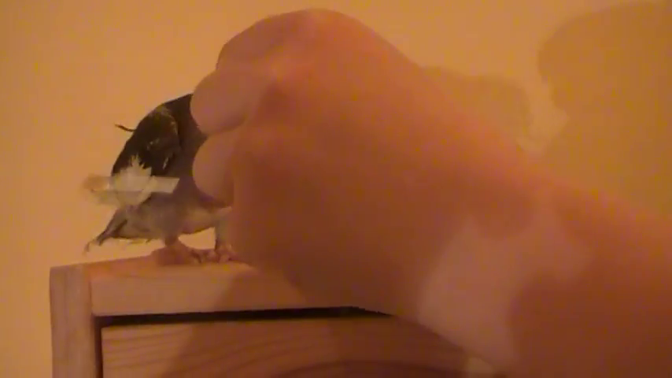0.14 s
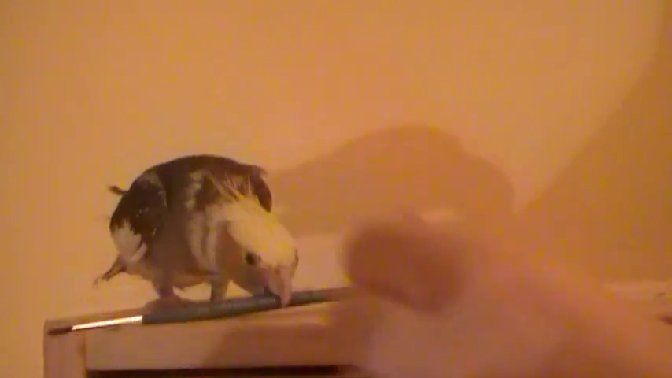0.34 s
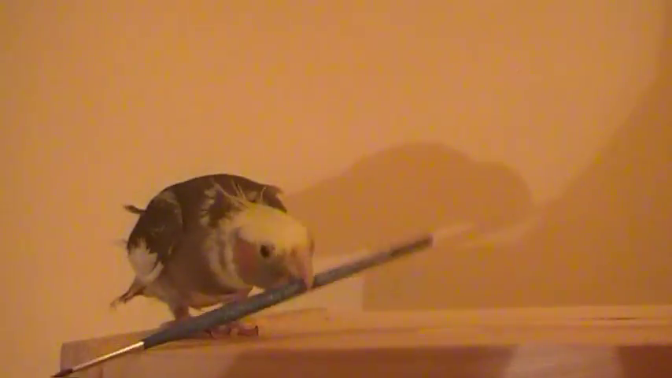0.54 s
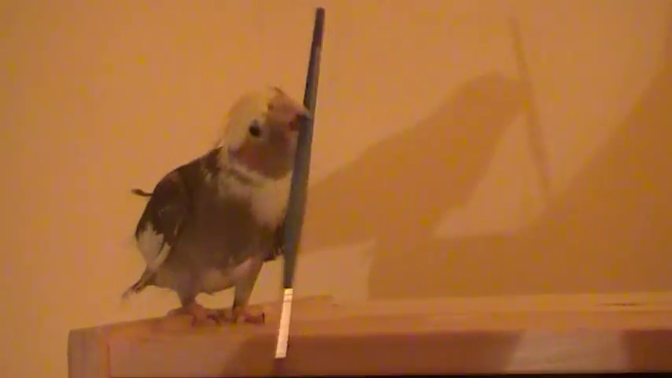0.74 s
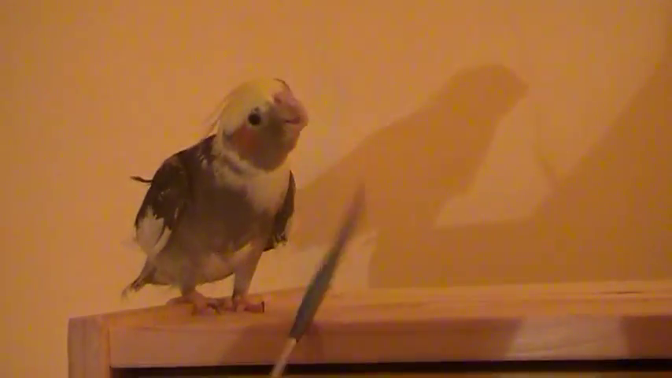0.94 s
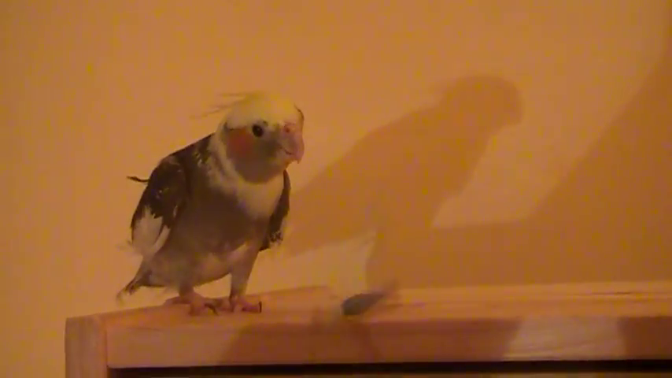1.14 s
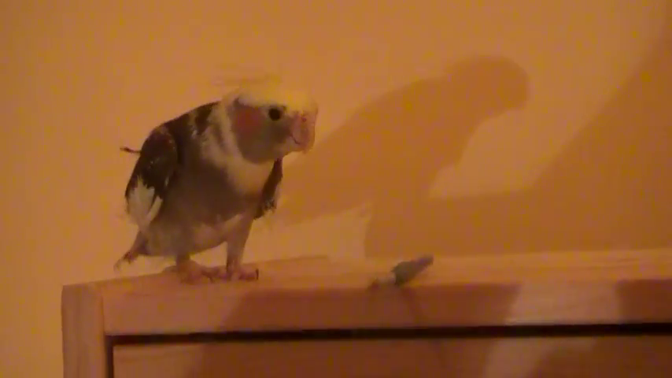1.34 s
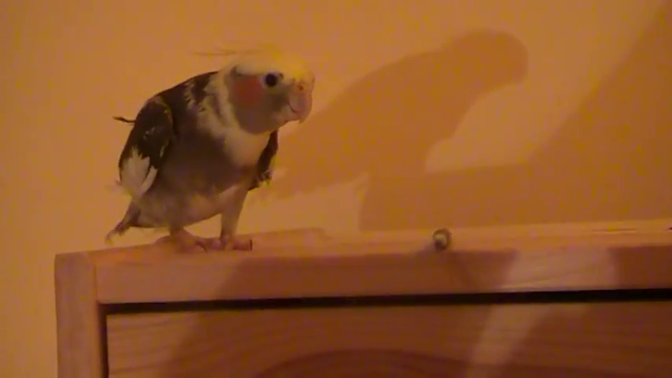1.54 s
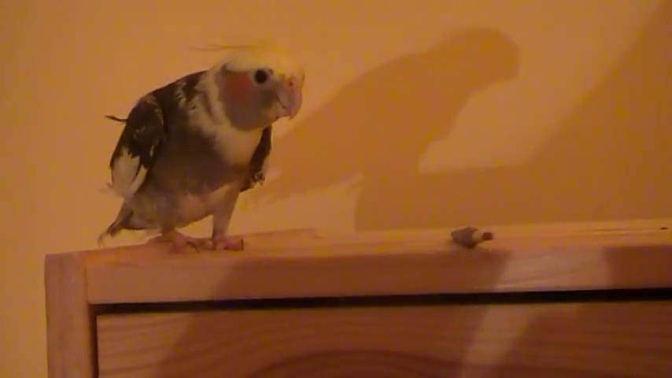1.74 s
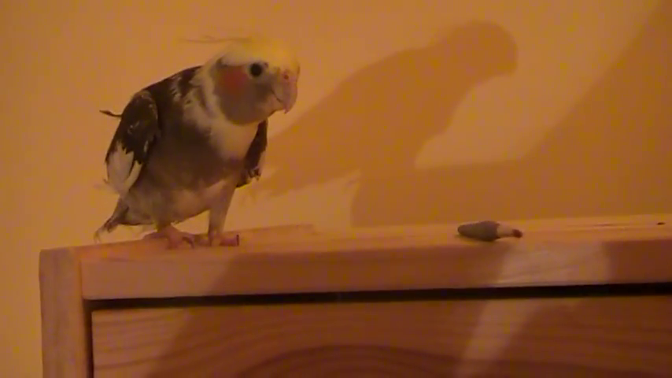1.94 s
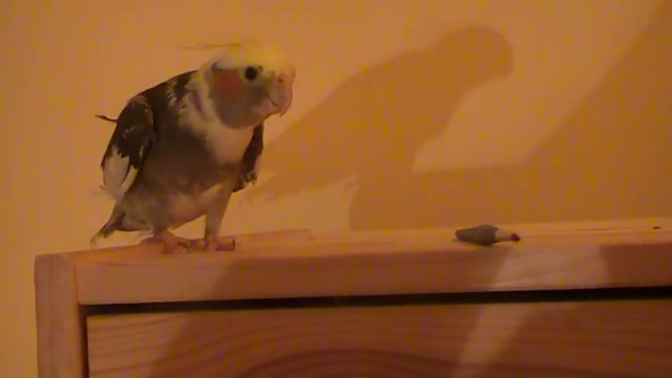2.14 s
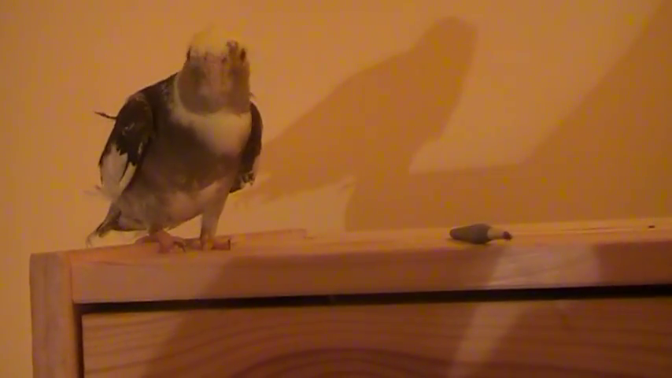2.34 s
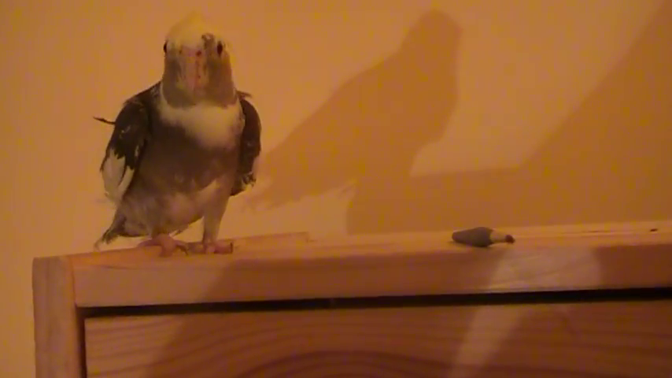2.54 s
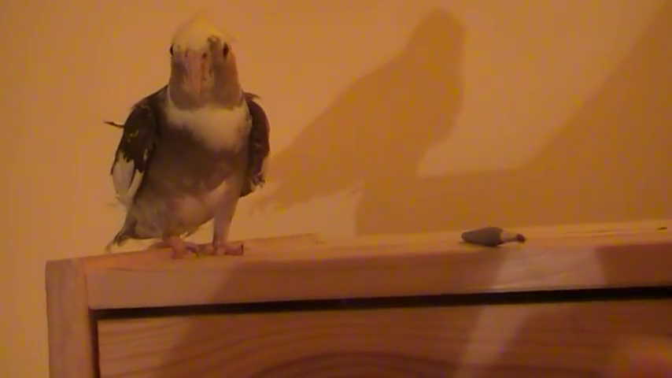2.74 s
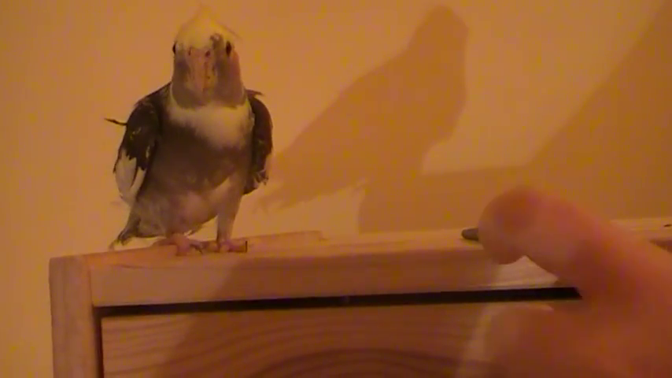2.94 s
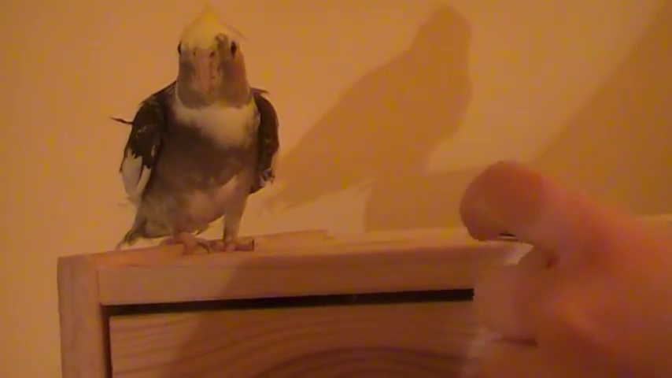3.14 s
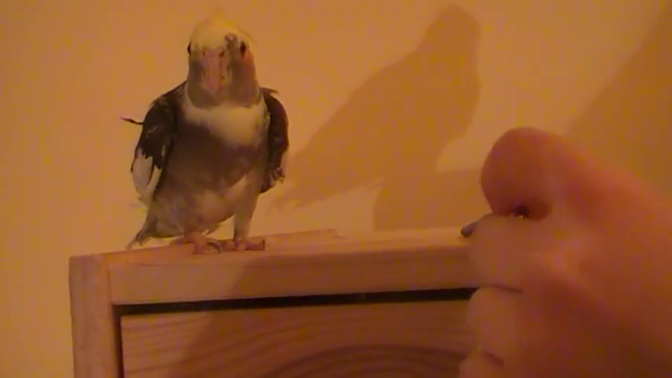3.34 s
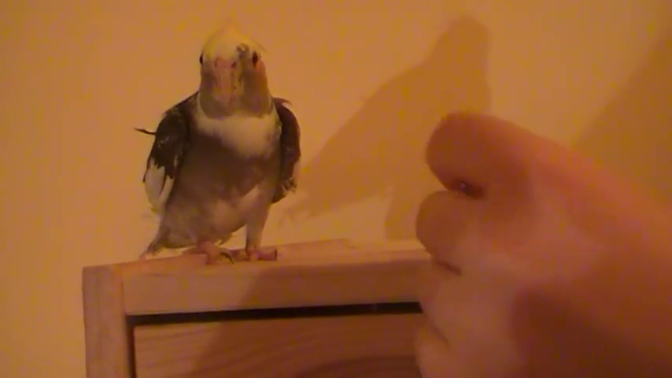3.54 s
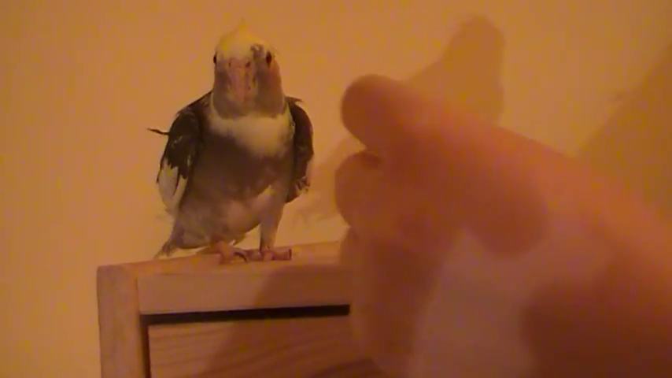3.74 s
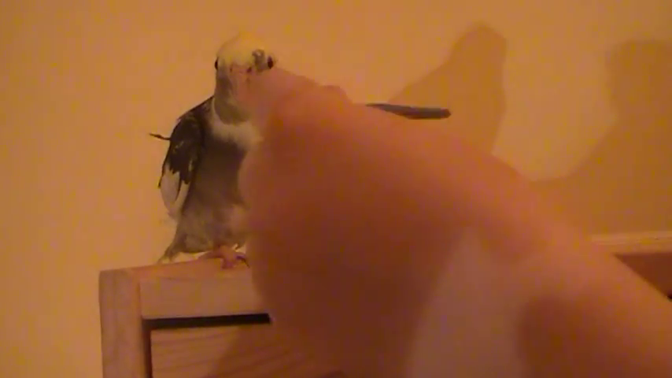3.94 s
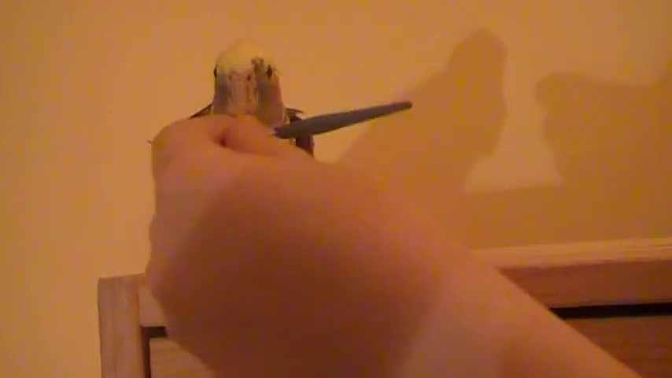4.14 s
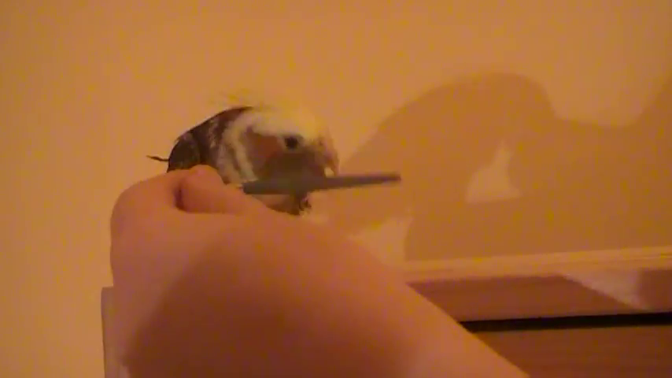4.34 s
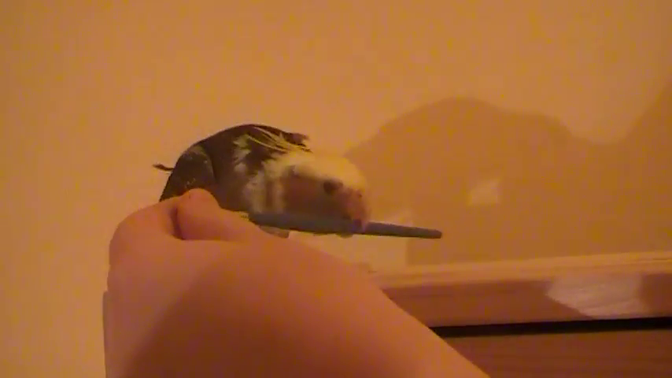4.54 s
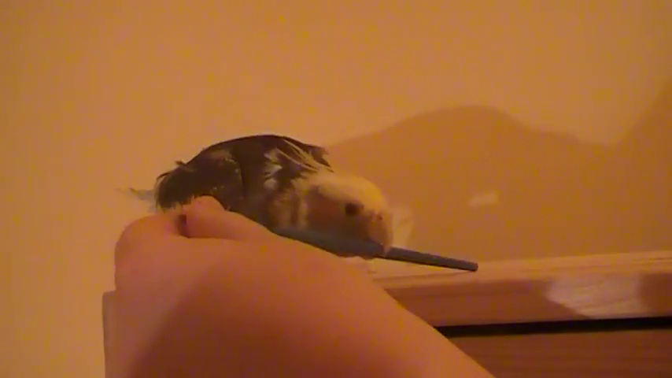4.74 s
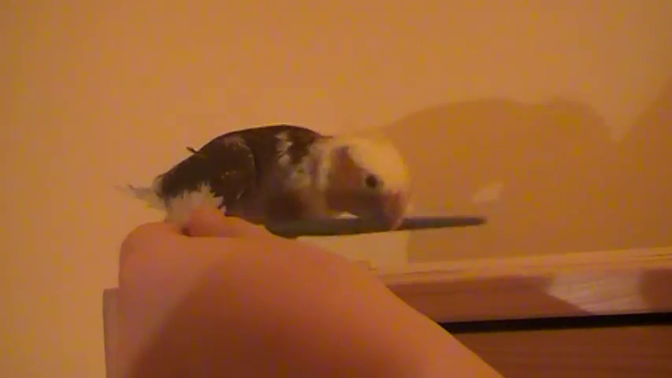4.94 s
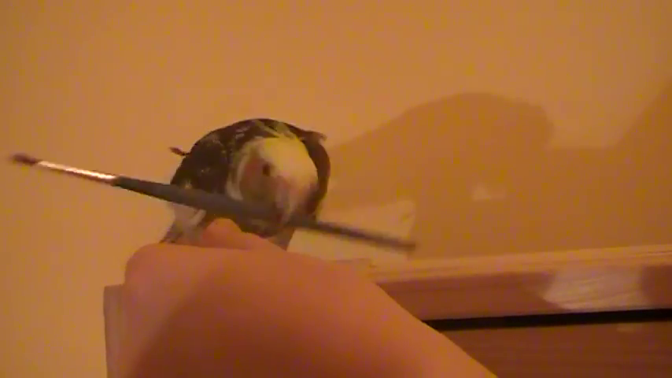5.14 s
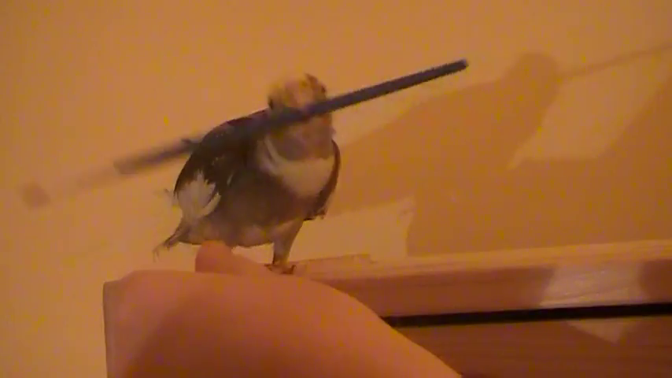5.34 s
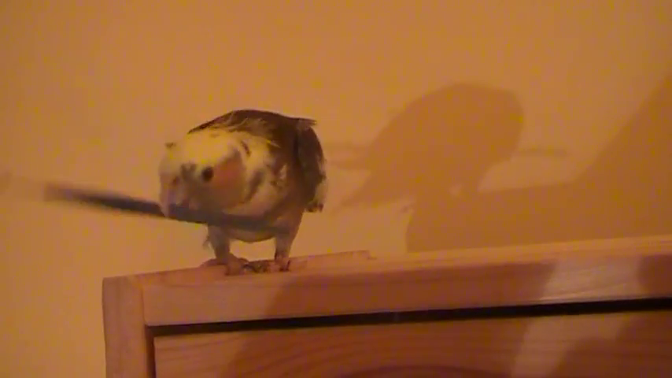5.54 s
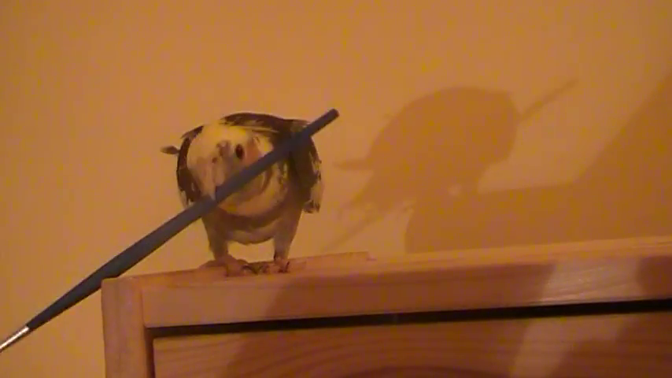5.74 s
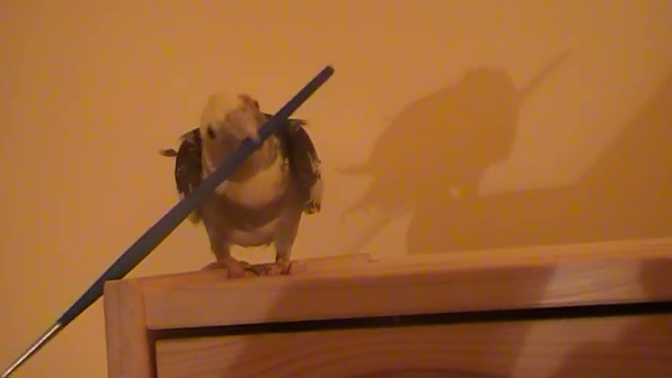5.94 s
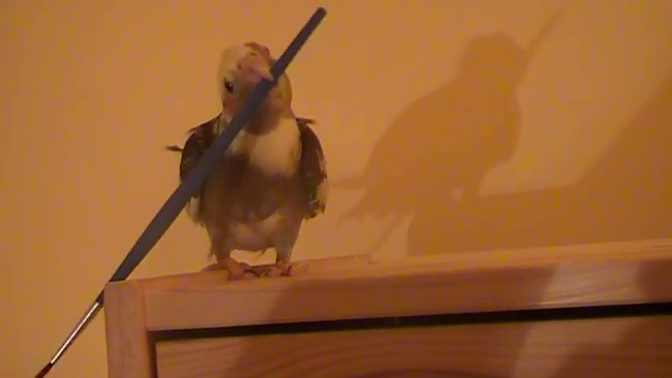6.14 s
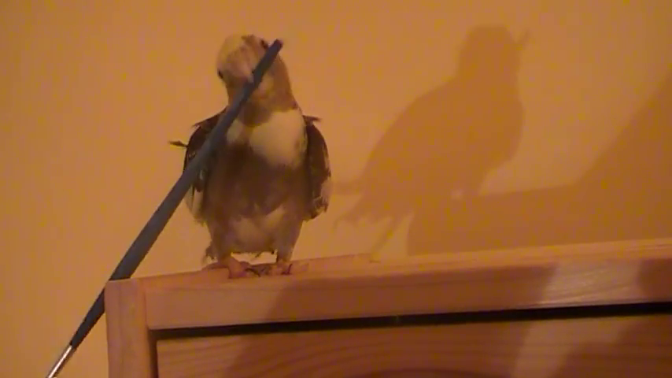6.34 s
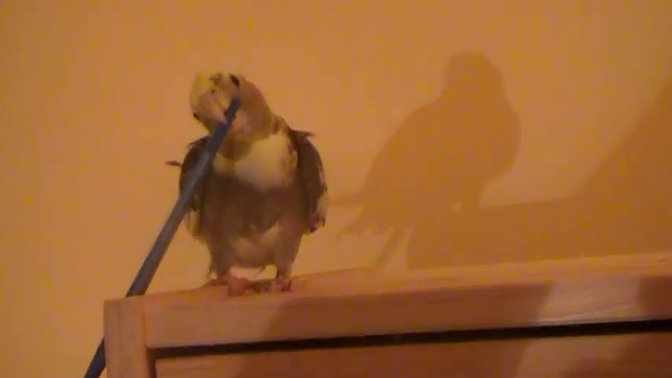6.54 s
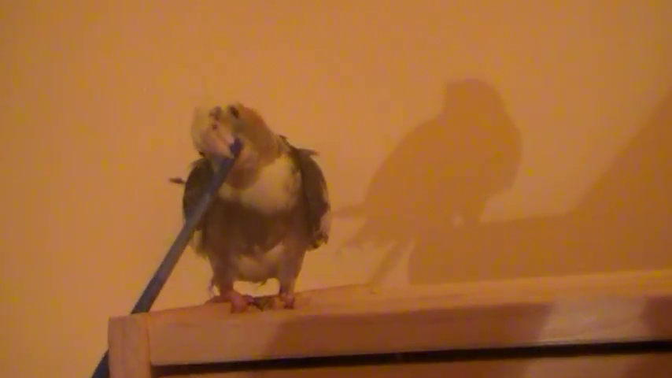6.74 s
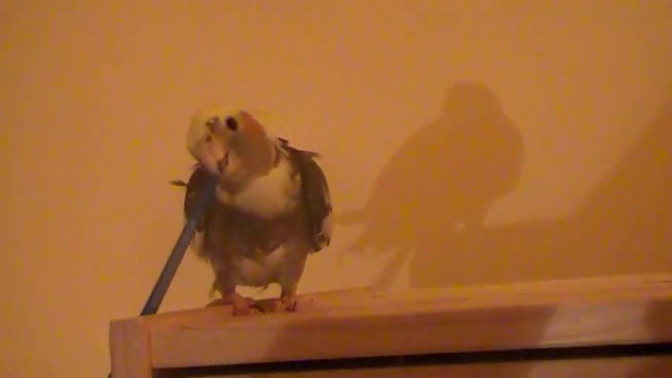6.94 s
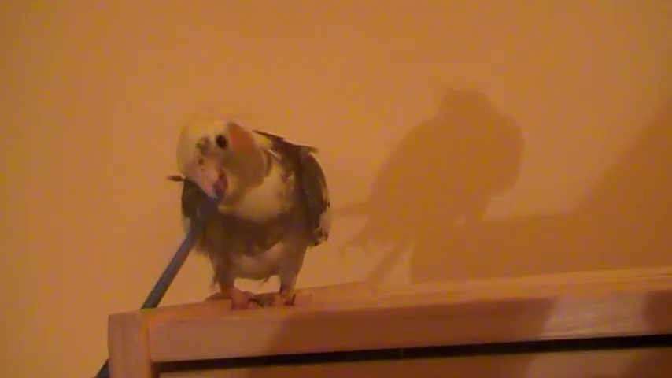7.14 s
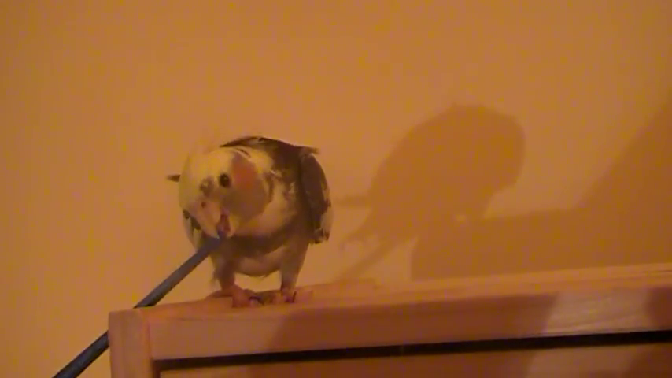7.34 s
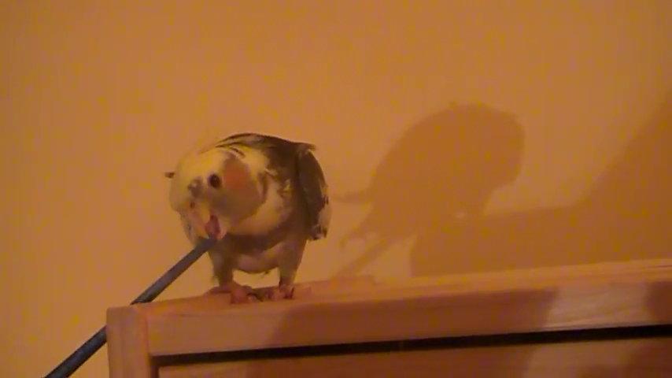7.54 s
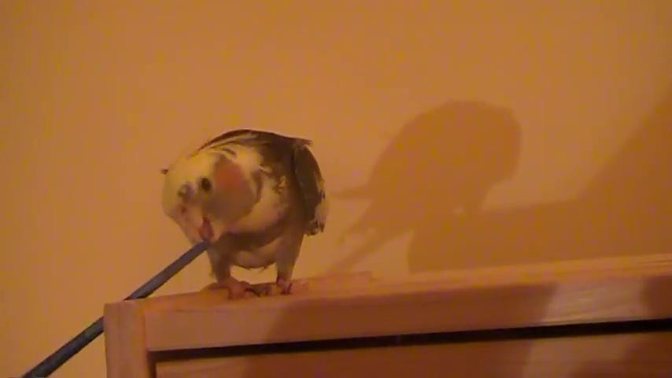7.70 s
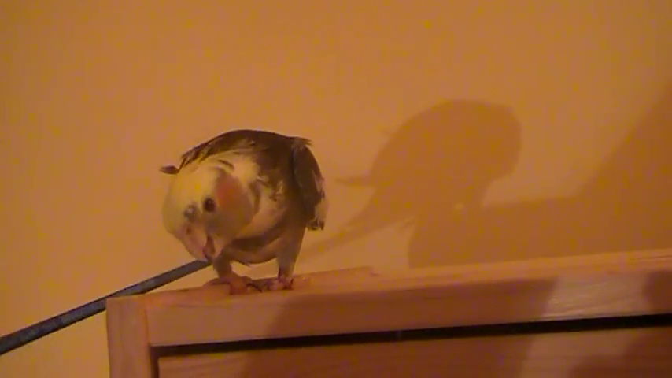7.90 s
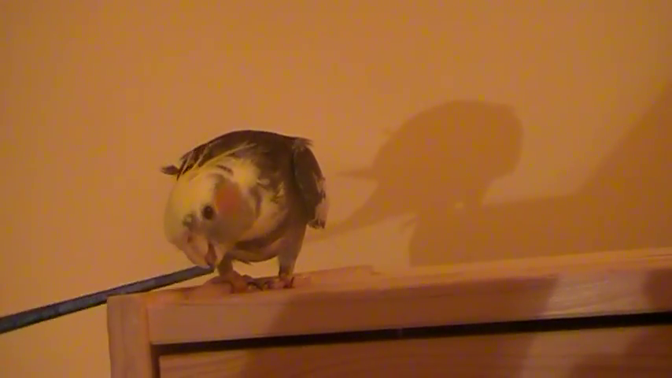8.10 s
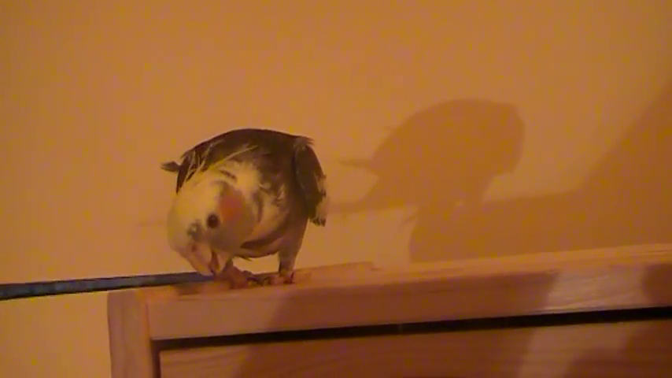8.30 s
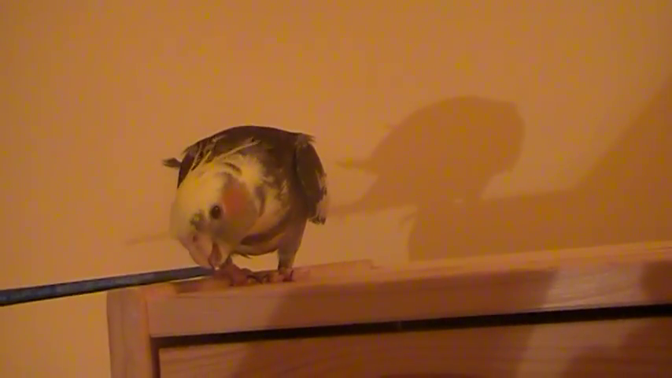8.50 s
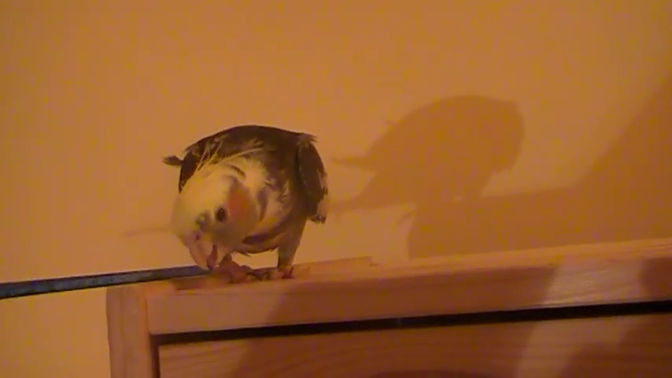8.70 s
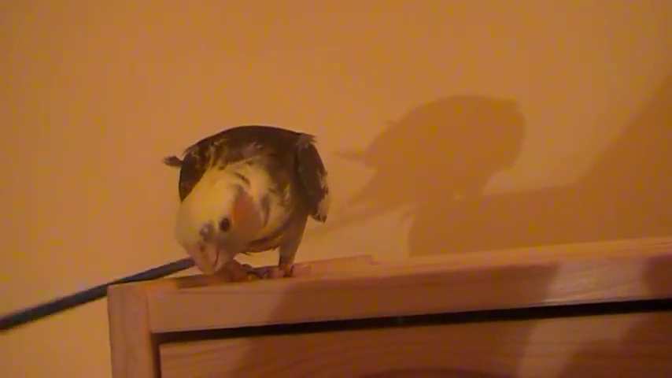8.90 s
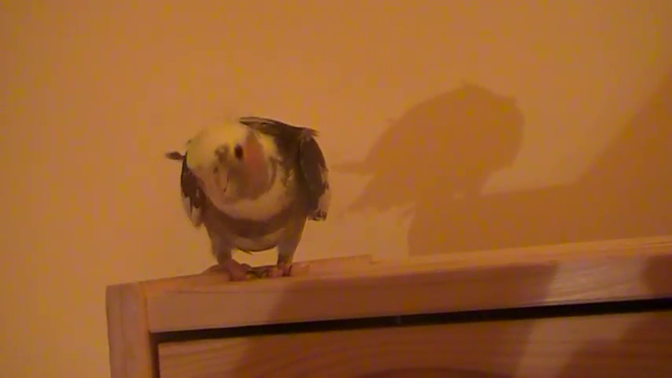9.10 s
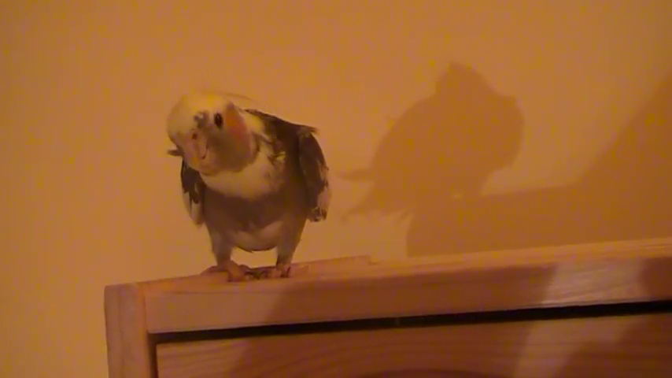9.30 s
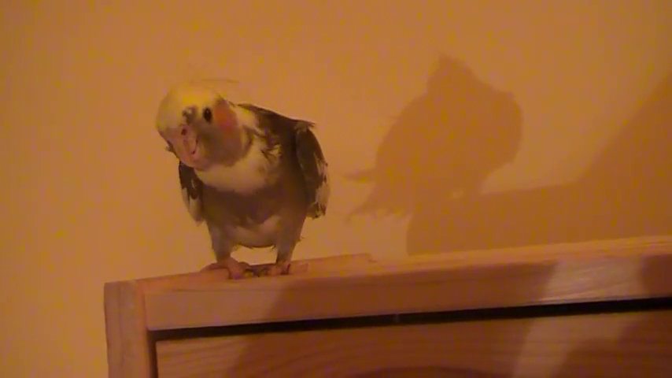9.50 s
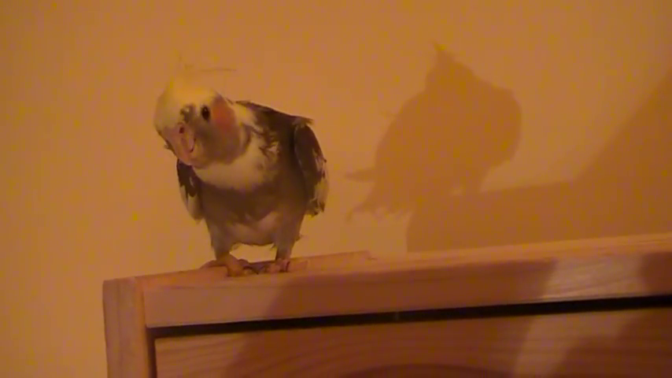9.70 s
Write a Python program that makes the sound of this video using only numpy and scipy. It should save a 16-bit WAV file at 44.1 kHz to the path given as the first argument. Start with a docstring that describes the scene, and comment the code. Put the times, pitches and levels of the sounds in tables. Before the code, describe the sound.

A small quiet room is heard from close by, with steady low hiss, a faint thin whine and light rustling of feathers and a hand. At 0.2 seconds a thin paintbrush clacks onto a wooden chest of drawers, and a pet bird scrapes and clicks at it with its beak. From 1 to 1.4 seconds the brush falls and bounces on the hollow top in loud, rapid clacks. A soft thud and light taps come around 2 seconds, then a lull. Faint nibbles begin at 4.3 seconds, and the handle strikes the edge between 5 and 5.6 seconds, twice sharply. From 6 to 9 seconds there are quiet scrapes, chewing, tiny ticks and a few soft low bumps. At 9.1 seconds the brush hits the floor and bounces in a bright clatter until 9.8, loudest near 9.5. Each hit has a short room echo.

```python
"""A small quiet room, a handheld camera facing a wooden chest of drawers with a wall close behind it.
On the chest a pet bird grabs, nibbles, swings and drops a thin paintbrush. Each contact is a short crack
that rings the handle and the hollow top; at the end the brush clatters on the floor. The wall repeats
every hit and the room adds a short tail. Underneath lie faint rustle and the camera's hiss and whine."""
import sys
import numpy as np
from scipy import signal
from scipy.fft import rfft, irfft, next_fast_len
from scipy.io import wavfile

SR = 44100
rng = np.random.default_rng(int(sys.argv[2]) if len(sys.argv) > 2 else 0)


def dump_mix(stems):
    """Bounce the given channels to the path in sys.argv[1] as a 16-bit WAV at rate SR."""
    frames = np.atleast_2d(stems).T  # one column per channel
    limited = np.clip(frames, -1, 1)  # hard clip at full scale
    pcm = np.round(limited * 32767).astype(np.int16)
    wavfile.write(sys.argv[1], SR, pcm)


N = 434826
FFT_SIZE = next_fast_len(N + SR)
FFT_HZ = np.fft.rfftfreq(FFT_SIZE, 1 / SR)


def amp(db):
    """Decibels to gain."""
    return 10 ** (np.asarray(db) / 20)


def at_hz(points, hz):
    """Read a (Hz, value) table on a log frequency axis."""
    p = np.array(points, float)
    return np.interp(np.log(np.maximum(hz, 1)), np.log(p[:, 0]), p[:, 1])


def coloured(spectrum):
    """Noise of a given spectrum, rms 1."""
    white = rfft(rng.standard_normal(FFT_SIZE))
    noise = irfft(white * amp(at_hz(spectrum, FFT_HZ)), FFT_SIZE)[:N]
    return noise / noise.std()


def drift(rate):
    """A random wander through `rate` points a second, each of spread 1."""
    return np.interp(np.arange(N) / SR * rate, np.arange(1000), rng.standard_normal(1000))


def stereo(mid, side):
    """Mid and side to left and right."""
    return np.array([mid + side, mid - side])


# The microphone's own hiss, mid and side. Each row: frequency in Hz, relative level in dB.
HISS_MID = [(15, -44), (25, -4.5), (76, 10.5), (146, 4.5), (568, -4), (1010, -13), (1120, -4), (2040, -8.5),
            (2210, -13.5), (2670, -5), (9080, -14.5), (14400, -23.5), (16500, -46)]
HISS_SIDE = [(15, -44), (25, -19), (70, 0), (214, 3.5), (433, 3), (483, -4.5), (568, 0.5), (1250, -6.5),
             (5130, -22.5), (7300, -28.5), (9580, -23.5), (15200, -38.5), (16500, -63)]
# The camera motor, right at the microphone. Each row: frequency in Hz, rms level in dB.
MOTOR_TONES = [(576.0, -74), (753.7, -77.5), (1109, -74.5), (2186, -75), (2304, -88.5), (10691, -93)]

def camera():
    """Capsule hiss, strongest in the side signal, and thin wavering motor tones."""
    t = np.arange(N) / SR
    mid, side = amp(-68) * coloured(HISS_MID), amp(-57) * coloured(HISS_SIDE)
    for hz, level_db in MOTOR_TONES:
        tone = np.sqrt(2) * amp(level_db + .6 * drift(3)) * np.sin(2 * np.pi * hz * t + drift(4))
        mid, side = mid + tone, side + .4 * tone
    return stereo(mid, side)


# Hand, sleeve and feathers, near the centre of the image. Each row: time in seconds, level in dB.
RUSTLE_LEVELS = [(0.0, -79), (0.401, -70), (0.568, -64), (0.8, -67.5), (0.97, -54.5), (1.1, -66),
                 (1.65, -79), (2.0, -80.5), (2.22, -69.5), (2.49, -76.5), (2.669, -70.5), (3.13, -81.5),
                 (3.89, -69.5), (4.59, -75), (5.04, -75.5), (5.75, -74), (5.84, -66), (5.95, -64),
                 (6.06, -63), (6.72, -77), (7.09, -74), (7.662, -81), (8.55, -69.5), (8.87, -63.5),
                 (9.0, -57.5), (9.08, -62), (9.2, -85)]
# Their bright rustle and low shuffle. Each row: frequency in Hz, relative level in dB.
RUSTLE_SPECTRUM = [(880, -21.5), (1500, -3), (2080, -3), (2440, -4.5), (3840, -7.5), (8570, -8),
                   (12500, -22.5), (16000, -40)]
SHUFFLE_SPECTRUM = [(35, -38), (60, -2.5), (171, -6), (241, 3), (422, 1), (1060, -2), (2500, -13),
                    (3250, -42), (5500, -120)]

def movement():
    """Cloth and feathers rustle in patches, over a low shuffle that swells with the strongest moves."""
    rustle_db = np.interp(np.arange(N) / SR, *np.transpose(RUSTLE_LEVELS))
    rest_db, threshold_db = -64, -63.5
    shuffle_db = rest_db + 1.87 * np.maximum(rustle_db - threshold_db, 0)
    rustle_gain = amp(rustle_db + 4.4 * drift(25))
    rustle = stereo(coloured(RUSTLE_SPECTRUM), .57 * coloured(RUSTLE_SPECTRUM))
    shuffle_gain = amp(shuffle_db + .54 * drift(4.8) + .79 * drift(2.5))
    shuffle = stereo(coloured(SHUFFLE_SPECTRUM), .25 * coloured(SHUFFLE_SPECTRUM))
    return rustle_gain * rustle + shuffle_gain * shuffle


# The small room's decay. Each row: frequency in Hz, time to fall 60 dB (t60) in seconds.
TAIL_T60 = [(100, 0.27), (400, 0.47), (1000, 0.49), (2800, 0.31), (7000, 0.32), (14000, 0.26)]
# Its colour. Each row: frequency in Hz, relative level in dB.
TAIL_COLOUR = [(100, -4), (200, 2), (400, 3), (1000, 3), (4000, -0.5), (12000, -5.5)]
# Its width at the microphone. Each row: frequency in Hz, side over mid in dB.
TAIL_WIDTH = [(100, -20), (500, -25.5), (2000, -7), (8000, -8.5), (15000, 8.5)]

def room_tail(t, tail_db, rise_s=.012):
    """Diffuse sound builds up, then dies away octave by octave."""
    mid, side = np.zeros((2, len(t)))
    for low in 70 * 2 ** np.arange(8):
        octave = signal.butter(2, [low, 2 * low], "band", fs=SR, output="sos")
        mid_noise, side_noise = signal.sosfilt(octave, rng.standard_normal((2, len(t))))
        hz = low * np.sqrt(2)
        decay = amp(at_hz(TAIL_COLOUR, hz) - 60 * t / at_hz(TAIL_T60, hz))
        mid += mid_noise * decay
        side += side_noise * decay * amp(at_hz(TAIL_WIDTH, hz))
    rise = 1 - np.exp(-(t / rise_s) ** 6.7)
    return rise * stereo(mid, side) * amp(tail_db) / np.sqrt(np.sum((rise * mid) ** 2))


# Echoes from the chest's position and from the floor, the close wall first.
# Each row: delay in seconds, level in dB, smear in seconds.
CHEST_ECHOES = [(.0035, -1, 0.00016), (.0065, -15, 0.0029), (.024, -10, .004), (0.033, -16.5, 0.0048)]
FLOOR_ECHOES = [(.0035, -3, 0.00031), (0.024, -12.5, 0.0056), (0.029, -11.5, .005), (.054, -16.5, 0.012)]
# The microphone's response to sound from a distance. Each row: frequency in Hz, gain in dB.
MICROPHONE = [(20, -43), (90, -4.5), (120, 8), (3000, 4), (6000, 1), (8500, 5), (10500, -1.5), (12500, -8),
              (14000, -16), (16000, -28)]

def room(source, echoes, tail_db):
    """Direct sound, echoes smeared by rough walls and the diffuse tail reach the microphone."""
    t = np.arange(SR // 2) / SR
    response = room_tail(t, tail_db)
    scattered = signal.butter(1, 610, "high", fs=SR)  # walls and furniture scatter little bass
    for delay, level_db, smear in echoes:
        shape = (t >= delay) * np.exp(-np.maximum(t - delay, 0) / smear)
        mid, side = signal.lfilter(*scattered, shape * rng.standard_normal((2, len(t))))
        response += amp(level_db) * stereo(mid, .36 * side) / np.sqrt(np.sum(mid ** 2))
    # The panels radiate their lows partly away from the microphone: half arrives directly.
    impulse = t == 0
    highs = signal.lfilter(*signal.butter(1, 900, "high", fs=SR), impulse)
    response += .5 * (impulse + highs)
    colour = amp(at_hz(MICROPHONE, FFT_HZ))
    return irfft(rfft(source, FFT_SIZE) * rfft(response, FFT_SIZE) * colour, FFT_SIZE)[:, :N]


def cracks(starts, levels_db, centres_hz, band_ratio, t60, spike):
    """The contact itself: a spike and a dying noise burst, in a band reaching band_ratio each way."""
    length = 4000
    out, t = np.zeros(N + length), np.arange(length) / SR
    bursts = rng.standard_normal((len(starts), length)) * amp(-60 * t / t60)
    bursts[:, 0] = spike
    for i, level_db, hz, burst in zip(np.round(starts * SR).astype(int), levels_db, centres_hz, bursts):
        edges = [hz / band_ratio, min(hz * band_ratio, .45 * SR)]
        burst = signal.sosfilt(signal.butter(2, edges, "band", fs=SR, output="sos"), burst)
        power = np.sum(burst ** 2) / (t60 * SR / 14)  # mean power while it lasts
        out[i:i + length] += amp(level_db) * burst / np.sqrt(power)
    return out[:N]


# Bumps elsewhere in the room. Each row: start in seconds, level in dB, centre in Hz.
BUMPS = [(2.037, -47, 207), (2.967, -66, 400), (3.358, -64.5, 355.5), (6.127, -51, 276),
         (6.775, -58.5, 365), (7.776, -55, 317), (7.818, -57, 207), (8.589, -57, 196.3)]

def bumps():
    """Soft contacts, each a low, narrow-band thud."""
    return cracks(*np.transpose(BUMPS), band_ratio=1.27, t60=.039, spike=6.3)


# Shuffling taps nearby. Each row: start in seconds, level in dB.
TAPS = [(2.0694, -62), (2.1194, -62), (2.239, -63.5), (2.2694, -68.5), (2.4794, -68)]

def taps(centre_hz=2500):
    """Light contacts, each a brighter, longer burst of broad noise."""
    return cracks(*np.transpose(TAPS), np.full(len(TAPS), centre_hz), band_ratio=4.2, t60=.26, spike=2.4)


# Beak or fingers scraping the handle, up on the chest. Each row: start in seconds, peak level in dB.
SCRAPES = [(0.357, -59), (0.42, -50), (0.4934, -51), (0.5596, -56), (0.6774, -52), (0.7614, -46.5),
           (0.853, -44.5), (0.927, -49), (0.947, -53), (2.163, -60), (2.9327, -61.5), (4.367, -57),
           (4.431, -61.5), (4.852, -61.5), (5.045, -59), (5.443, -56.5), (5.804, -58), (5.817, -54.5),
           (6.19, -61.5), (6.238, -58), (6.45, -56.5), (7.926, -60), (9.08, -51)]
# The bird chewing the tip. Each row: start in seconds, end in seconds, level in dB.
CHEWS = [(6.897, 7.015, -67.5), (7.118, 7.349, -67), (7.691, 7.798, -67)]
# Resonances of the gripped handle. Each row: frequency in Hz, width in Hz, gain in dB.
GRIPPED_HANDLE = [(2020, 150, -0.5), (4150, 440, -1), (6430, 140, 4.5), (9000, 440, 2), (13150, 490, 0)]

def nibbles(scrape_s=.013, chew_gap_s=.03):
    """Grainy scrapes, sudden at the start and soft at the end, sound through the gripped handle."""
    t, envelope = np.arange(N) / SR, np.zeros(N)
    scrapes = list(SCRAPES)
    for start, end, level_db in CHEWS:  # a chew is an uneven run of faint scrapes
        for k, (lag, force) in enumerate(rng.random((10, 2))):
            if start + chew_gap_s * k < end:
                scrapes.append((start + chew_gap_s * (k + lag), level_db + 6 * (force - .5)))
    for start, level_db in scrapes:
        span = slice(round(start * SR), round((start + .15) * SR))
        envelope[span] += amp(level_db) * np.exp(-(np.abs(t[span] - start) / scrape_s) ** 1.3)
    grains = envelope * rng.standard_normal(N) * rng.exponential(1, N) + 1e-18
    out = np.zeros(N)
    for k, (hz, width_hz, gain_db) in enumerate(GRIPPED_HANDLE):
        r, w = np.exp(-np.pi * width_hz / SR), 2 * np.pi * hz / SR
        resonance = np.array([1, 0, -1]) * (1 - r * r) / 2, [1, -2 * r * np.cos(w), r * r]
        out += (-1) ** k * amp(gain_db) * signal.lfilter(*resonance, grains)
    return out


def ring(starts, strength_db, modes, contact_hz, scatter_db):
    """Each blow rings every mode with a strength of its own; a soft contact dulls it above contact_hz."""
    onsets = np.round(starts * SR).astype(int)
    out, scatter = np.zeros(N), rng.standard_normal((len(starts), len(modes)))
    for k, (hz, level_db, t60) in enumerate(modes):
        clicks = np.full(N, 1e-18)
        clicks[onsets] = amp(strength_db + level_db + scatter_db * scatter[:, k])
        r, w = amp(-60 / (t60 * SR)), 2 * np.pi * hz / SR
        out += (-1) ** k * signal.lfilter([0, np.sin(w)], [1, -2 * r * np.cos(w), r * r], clicks)
    return signal.sosfilt(signal.butter(2, contact_hz, fs=SR, output="sos"), out)


# Modes of the free brush handle. Each row: frequency in Hz, level in dB, t60 in seconds.
FREE_HANDLE = [(2180, -27.5, 0.035), (4060, -2, 0.018), (6290, 1.5, 0.04), (9590, 0.5, 0.013),
               (13400, -5, 0.013)]
# It rings less under the brightest cracks. Each row: crack centre in Hz, ring over crack in dB.
HANDLE_DRIVE = [(5000, -7), (9500, -18.5)]

def blows(hits, surface):
    """Two cracks, the struck surface (more low modes for a weightier blow) and the ringing handle."""
    starts, sharp_db, sharp_hz, dull_db, dull_hz, clack_db, weight_db = np.transpose(hits)
    boom, knock, clack = surface
    boom_db = clack_db + .5 + 1.9 * weight_db
    handle_db = sharp_db + at_hz(HANDLE_DRIVE, sharp_hz)
    return (cracks(starts, sharp_db, sharp_hz, band_ratio=1.44, t60=.011, spike=2.5)
            + cracks(starts, dull_db, dull_hz, band_ratio=1.556, t60=.035, spike=6.2)
            + ring(starts, boom_db, boom, contact_hz=400, scatter_db=-4.7)
            + ring(starts, clack_db + weight_db, knock, contact_hz=600, scatter_db=3)
            + ring(starts, clack_db, clack, contact_hz=3500, scatter_db=3.5)
            + ring(starts, handle_db, FREE_HANDLE, contact_hz=15000, scatter_db=4.5))


# The floor's boom, knock and clack modes. Each row: frequency in Hz, level in dB, t60 in seconds.
FLOOR_MODES = ([(150, -6, 0.056), (207, -3, 0.079)], [(297, -3.5, 0.069), (351, -1, 0.064),
               (428, -2, 0.043), (546, -0.5, 0.071)], [(640, -3, 0.035), (815, -1.5, 0.029),
               (995, -2, 0.012), (1436, 3.5, 0.0079), (1660, -9, 0.021)])
# The brush landing below the chest. Each row: start in seconds, sharp crack's level in dB and centre
# in Hz, dull crack's level in dB and centre in Hz, clack level in dB, weight (knock over clack) in dB.
FLOOR_HITS = [(9.1102, -30, 5700, -31, 3140, -36, 1.5), (9.2234, -74, 5000, -28.5, 2500, -32, -7.5),
              (9.2918, -32, 8100, -37.5, 3600, -52.5, 2.5), (9.3237, -33, 8600, -43, 2920, -49, -4),
              (9.416, -43, 8900, -49, 2200, -30.5, -7.5), (9.4659, -7, 7600, -20.5, 3780, -27.5, -15),
              (9.7403, -22.5, 8900, -30.5, 3620, -35, -6.5), (9.7777, -26, 9800, -33, 4600, -48.5, 3.5),
              (9.7986, -14.5, 8700, -22.5, 4200, -36.5, -6.5)]

def floor_clatter():
    """The dropped brush bounces, and the floor answers each bounce with a short knock."""
    return blows(FLOOR_HITS, FLOOR_MODES)


# The chest's hollow top and its rim. Groups and rows as in FLOOR_MODES.
TOP_MODES = ([(99.6, -7.5, 0.43), (120.6, 0, 0.11), (207, -2.5, 0.33)], [(327.8, -10, 0.23),
             (400, 0.5, 0.036), (478, -2, 0.12)], [(613, -14, 0.09), (734.5, -9.5, 0.11),
             (828, -13.5, 0.086), (917, -10.5, .07), (1051, -4, 0.062), (1170, -4, 0.03),
             (1214, -10, 0.045), (1309, -6, 0.053), (1387, -5.5, 0.076), (1577, -8, 0.058),
             (2010, -11, 0.091), (2220, -15.5, 0.11)])
RIM_MODES = ([(127, -0.5, 0.13), (209.7, 0.5, 0.31)], [(296, 4, 0.072), (377, 9.5, 0.038), (453, 7, 0.044),
             (587, 7.5, 0.059)], [(687, -1.5, 0.067), (797, -0.5, 0.041), (976, 0, 0.019), (1310, 1, 0.02),
             (1578, 7.5, 0.016), (1870, 7, 0.011), (2305, -7.5, 0.061)])
# Contacts on top and rim, in front of the microphone. Rows as in FLOOR_HITS.
TOP_HITS = [(0.221, -20.5, 5660, -21.5, 3470, -37, -9.5), (0.27, -55, 5900, -48, 1950, -42, -4.5),
            (0.4444, -55, 6530, -57.5, 2160, -57, -18), (0.5059, -60.5, 6550, -55, 1980, -56.5, -10),
            (0.7296, -45, 8860, -45.5, 2280, -49, -11), (0.7806, -71, 5440, -57, 2160, -55, -2),
            (0.7996, -58, 5040, -48.5, 2030, -54.5, -6), (0.897, -45, 8720, -47, 2200, -48.5, -19),
            (0.9244, -52, 7500, -55, 2000, -42, -20), (0.942, -47, 6480, -48, 2170, -41, -11),
            (0.9856, -12.5, 7800, -21.5, 3020, -28, -8.5), (1.0883, -49, 4400, -31, 2100, -23, -11.5),
            (1.1144, -70, 7320, -53, 1970, -60, 1), (1.1494, -56, 4500, -29, 2060, -23, -15),
            (1.164, -15, 9600, -25.5, 3400, -43.5, 1.5), (1.1894, -41, 6420, -35.5, 3260, -39, -8),
            (1.292, -20.5, 8100, -27, 3400, -36.5, -5), (1.3306, -59, 7400, -31, 2060, -31, -23),
            (1.3549, -47, 5150, -59, 2140, -39, -11), (1.3674, -33.5, 6750, -33, 3480, -32, -3.5),
            (2.041, -52, 8310, -48.5, 2800, -52.5, -6), (4.3268, -49.5, 6550, -51, 2120, -67.5, -5.5),
            (4.693, -63.5, 6680, -58.5, 1740, -61, 2.5), (4.8203, -57, 6100, -61.5, 3440, -76, -0.5),
            (6.3352, -50.5, 8900, -58.5, 2790, -68.5, 0.5), (6.394, -55.5, 6200, -59.5, 2800, -67.5, 0),
            (6.756, -57.5, 6500, -59, 4150, -73.5, -3), (6.78, -61.5, 6300, -61.5, 2190, -66, -2),
            (8.8237, -52, 8250, -62.5, 2180, -70.5, 1.5), (8.845, -56, 6690, -61, 3280, -59, -5)]
RIM_HITS = [(5.066, -48, 9340, -50, 1820, -52.5, -3), (5.0883, -43, 8950, -45, 1890, -61, -1.5),
            (5.0976, -36, 8700, -43.5, 3960, -54, -5.5), (5.2411, -22, 6800, -28, 3960, -52, -5.5),
            (5.4943, -44, 7340, -35.5, 3900, -52.5, -15), (5.6205, -29, 5550, -31, 2100, -43.5, -5)]

def chest_knocks():
    """Brush, beak, claw or hand rings the hollow top, and the swung brush strikes the rim."""
    return blows(TOP_HITS, TOP_MODES) + blows(RIM_HITS, RIM_MODES)


def scene():
    """From the camera's position: all contacts sound in the room, over movement and camera noise."""
    above_floor = room(chest_knocks() + nibbles() + bumps() + taps(), CHEST_ECHOES, tail_db=-8)
    on_floor = room(floor_clatter(), FLOOR_ECHOES, tail_db=-6.5)
    return above_floor + on_floor + movement() + camera()


def record(dry):
    """The recorder rounds off the peaks and cuts the highest treble steeply."""
    ceiling, cutoff_hz = .6, 16900
    rounded = ceiling * np.tanh(dry / ceiling)
    return signal.sosfilt(signal.cheby2(14, 60, cutoff_hz, fs=SR, output="sos"), rounded)


dry = scene()
out = record(dry)
dump_mix(out)
```